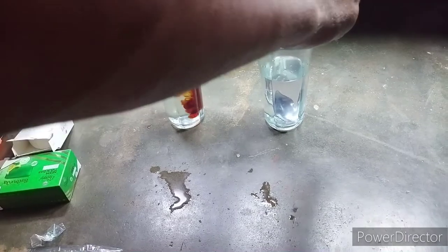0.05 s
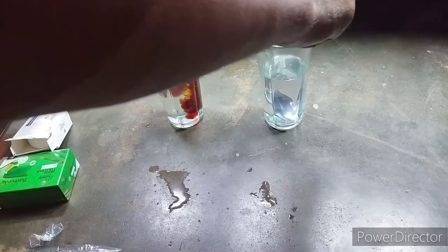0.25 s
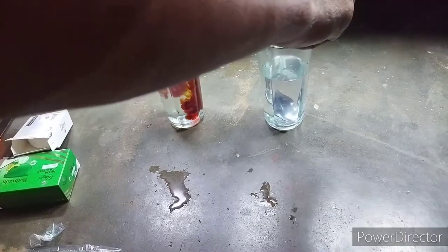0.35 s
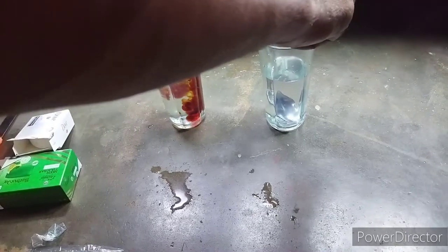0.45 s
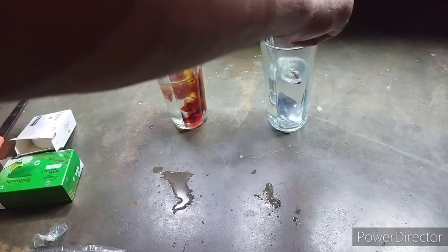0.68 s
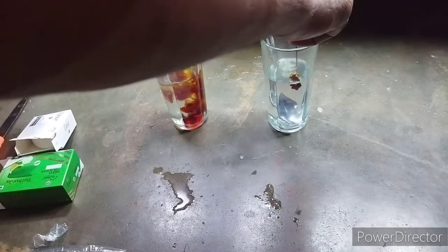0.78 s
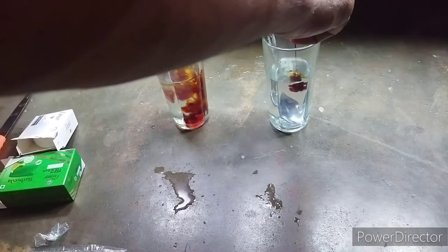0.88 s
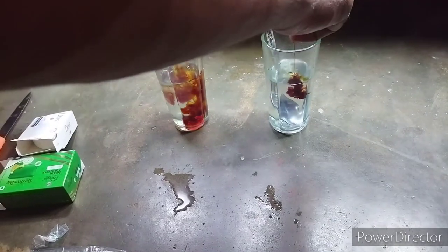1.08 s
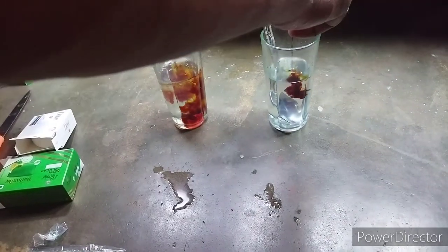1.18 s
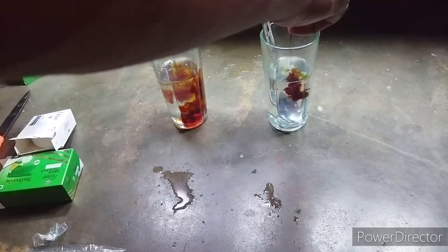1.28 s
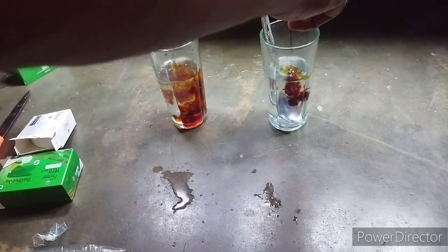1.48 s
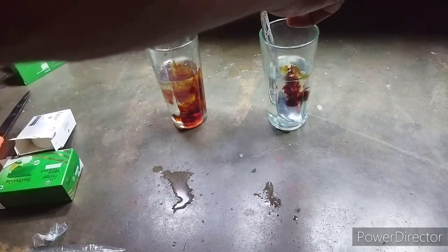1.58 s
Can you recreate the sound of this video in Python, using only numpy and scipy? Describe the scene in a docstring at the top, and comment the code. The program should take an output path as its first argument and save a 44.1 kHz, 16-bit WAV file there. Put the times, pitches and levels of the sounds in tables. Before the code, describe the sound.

Water drips softly into a glass with tiny high pings, following a low bump.

```python
"""A quiet room, one microphone close to a glass of water on a table. Drops fall in: each lands with a
faint tick, rings the glass a little and traps a tiny bubble that gives a short, high ping.
A dull handling bump booms early on, a much softer one follows, and their low ring dies away.
Room rumble, hum and hiss lie under everything."""
import sys
import numpy as np
from scipy import signal
from scipy.fft import rfft, irfft, next_fast_len
from scipy.io import wavfile
from scipy.ndimage import uniform_filter1d, map_coordinates

SR = 44100
rng = np.random.default_rng(int(sys.argv[2]) if len(sys.argv) > 2 else 0)


def master_out(mix):
    """Clip the mix to full scale and print it as 16-bit PCM to the path in sys.argv[1]."""
    frames = np.transpose(np.atleast_2d(mix))
    ceiling = np.clip(frames, -1, 1)
    pcm = np.round(ceiling * 32767).astype(np.int16)
    wavfile.write(sys.argv[1], SR, pcm)


N = 72765

# Drops landing close to the microphone: t/s, ping f/Hz, ping level/dB, ping t60/s, tick level/dB
DROPS = [(0.897, 2750, -42.5, 0.011, -52), (.9005, 13700, -40.5, 0.0073, -66.5),
         (0.9126, 5210, -43.5, 0.013, -67), (1.001, 4850, -48, 0.017, -56.5),
         (1.008, 4020, -60, 0.037, -58), (1.0213, 13000, -47, 0.0062, -65),
         (1.0387, 9800, -44.5, 0.0071, -53), (1.0534, 11650, -42.5, .009, -55),
         (1.0558, 7350, -52, .015, -68), (1.0655, 2880, -50.5, .025, -49.5),
         (1.1651, 3820, -55, 0.034, -59), (1.1872, 11740, -41, 0.009, -55), (1.1894, 3990, -57, 0.048, -73),
         (1.1911, 2477, -59.5, 0.096, -59), (1.215, 4370, -54, 0.017, -62),
         (1.2362, 7000, -50, 0.0044, -58), (1.316, 3020, -56, 0.027, -54), (1.3186, 3830, -56, 0.042, -59),
         (1.3245, 12800, -53, 0.0036, -53.5), (1.3477, 4660, -41.5, .013, -56),
         (1.4201, 2740, -54, 0.033, -53), (1.426, 8500, -44, 0.011, -59), (1.4289, 7130, -42.5, 0.013, -68),
         (1.5132, 2870, -43, 0.02, -51.5), (1.605, 7100, -56.5, .006, -70),
         (1.6298, 3860, -45.5, 0.037, -53), (1.6304, 6930, -39.5, 0.0084, -59.5)]
# Colour of the tick on the water: f/Hz, relative level/dB
TICK_SPECTRUM = [(500, -14), (1800, 14), (2800, 16.5), (5000, 20), (9000, 17.5), (14000, 16), (16000, -11)]
# Modes of the glass: f/Hz, level/dB re the tick, t60/s
GLASS_MODES = [(2437, -18, 0.24), (2716, -17.5, 0.18), (3990, -20, 0.07), (5150, -16, 0.09),
               (8360, -23.5, 0.2)]
def drips(attack_s=0.00047, tick_t60_s=0.014, echoes_db=-8, room_db=-7.5):
    """Each drop ticks on the water, rings the glass and traps a bubble; table and room answer."""
    out = np.zeros(N)
    splash, white = noise(TICK_SPECTRUM), rng.standard_normal(N)
    for start, hz, ping_db, t60, tick_db in DROPS:
        t = since(start)
        ping = amp(ping_db) * bubble(t, hz, t60, white)
        ring = sum(amp(db + rng.normal(0, 0.8)) * np.sin(2 * np.pi * f * t) * fade(t, life)
                   for f, db, life in GLASS_MODES)
        tick = amp(tick_db) * (splash * fade(t, tick_t60_s) + ring)
        drop = (ping + tick) * (1 - np.exp(-t / attack_s))
        out += drop + amp(echoes_db) * near_echoes(drop) + amp(room_db) * room_tail(drop)
    return out


def bubble(t, hz, t60, white, rise_per_s=1.24, waver_rad=0.54, spatter_db=-11, spatter_octaves=0.17):
    """A trapped bubble pings, climbing slightly, in a wet spatter of noise around its pitch."""
    waver = waver_rad * wobble(400)
    phase = 2 * np.pi * hz * t * (1 + rise_per_s * np.minimum(t, t60) / 2) + waver
    spatter = unit(filtered(white, lambda f: 1 / (1 + (np.log2((f + 1) / hz) / spatter_octaves) ** 2)))
    return np.sin(phase) * fade(t, t60) + amp(spatter_db) * spatter * fade(t, 1.62 * t60)


def near_echoes(x, first_s=0.003, span_s=0.012):
    """Eight early echoes reach the microphone off nearby surfaces such as the table."""
    delays_s = first_s + span_s * rng.random(8)
    gains = rng.standard_normal(8)
    gains /= np.linalg.norm(gains)
    return sum(gain * np.pad(x, (int(SR * s), 0))[:N] for s, gain in zip(delays_s, gains))


# Decay of the room around the glass: f/Hz, t60/s
ROOM_DECAY = [(500, .3), (3000, 0.68), (8000, 0.38), (15000, 0.34)]
def room_tail(x):
    """The room's faint reverberation, lingering longest around 3 kHz."""
    hz, t, spectra = signal.stft(rng.standard_normal(SR // 2), SR, nperseg=256)
    tail = signal.istft(spectra * fade(t, along(ROOM_DECAY, hz)[:, None]), SR, nperseg=256)[1]
    tail = np.pad(tail, (SR // 400, 0)) / np.linalg.norm(tail)  # arrives 2.5 ms late
    return signal.fftconvolve(x, tail)[:N]


# Handling bumps: t/s, level/dB
HANDLING_BUMPS = [(0.211, -26), (0.789, -46)]
# Low ring of a bump: f/Hz, level/dB re the bump, t60/s, attack/s
BOOM_MODES = [(54.85, 4.5, 0.8, 0.028), (91, -5, 1, 0.062), (110.5, -13, 0.86, 0.025),
              (142.4, -13, .36, 0.016), (175.5, -23.5, 0.44, 0.011)]
# Colour of its dull puff: f/Hz, relative level/dB
THUD_SPECTRUM = [(30, -13), (60, -5.5), (140, -5.5), (250, -13.5), (500, -27), (1200, -55), (4000, -90)]
def bumps(twin_offset_hz=9, twin_db=-6.5, thud_db=-18, thud_t60_s=0.58, thud_attack_s=0.0042):
    """A soft knock swells into low modes, each beating with a weaker twin, and a puff of dull noise."""
    out = np.zeros(N)
    for start, db in HANDLING_BUMPS:
        t = since(start)
        for hz, mode_db, t60, attack_s in BOOM_MODES:
            twin = amp(twin_db) * np.sin(2 * np.pi * (hz + twin_offset_hz) * t)
            pair = np.sin(2 * np.pi * hz * t) - twin
            out += amp(db + mode_db) * pair * fade(t, t60) * (1 - np.exp(-t / attack_s))
        thud = noise(THUD_SPECTRUM) * fade(t, thud_t60_s) * (1 - np.exp(-t / thud_attack_s))
        out += amp(db + thud_db) * thud
    return out


# Colour of the room's rumble: f/Hz, relative level/dB
RUMBLE_SPECTRUM = [(20, -14.5), (36, -24.5), (48, -2), (60, -6.5), (77, -16), (100, -4), (130, -8),
                   (170, -18.5), (215, -16), (260, -25), (320, -23.5), (520, -28.5), (750, -34),
                   (1100, -40), (1800, -44.5), (4000, -89)]
# Its slow rise and fall: t/s, level/dB
RUMBLE_SWELL = [(0, -54), (0.149, -56.5), (.4, -52), (.85, -51.5), (1.25, -53), (1.65, -52)]
# Hum in the room, at the swell's last point: f/Hz, rms level/dB
HUM_LINES = [(64.6, -49.5), (97, -57.5), (306, -71), (402, -83), (603, -79.5), (705, -84), (783, -82.5)]
# Colour of the hiss floor: f/Hz, relative level/dB
HISS_SPECTRUM = [(100, -22.5), (300, 19), (600, 11.5), (1000, 3.5), (1800, 2), (3500, 0.5), (5500, -1.5),
                 (6900, 2), (8500, -2.5), (12000, -3), (15500, -3)]
def room_tone(waver_db=2.5, waver_rad=0.51, hiss_db=-66):
    """Behind the glass, low rumble and a wavering hum swell together over a steady hiss."""
    times, levels = np.transpose(RUMBLE_SWELL)
    swell_db = np.interp(since(0), times, levels)
    hum = np.zeros(N)
    for hz, db in HUM_LINES:
        peak = np.sqrt(2) * amp(db + waver_db * wobble(7.74))
        hum += peak * np.sin(2 * np.pi * hz * since(0) + waver_rad * wobble(8.15))
    rumble = amp(swell_db) * patchy(noise(RUMBLE_SPECTRUM), depth_db=3)
    return rumble + amp(swell_db - levels[-1]) * hum + amp(hiss_db) * noise(HISS_SPECTRUM)


def patchy(x, depth_db):
    """Narrow bands of a noise swell and sink on their own, less so below 400 Hz."""
    spectra = signal.stft(x, nperseg=2048)[2]
    drift = uniform_filter1d(rng.standard_normal(spectra.shape), size=3, axis=0)
    drift = unit(uniform_filter1d(drift, size=5, axis=1))
    above_bass = np.clip(np.fft.rfftfreq(2048, 1 / SR) / 400, 0, 1)[:, None]
    return unit(signal.istft(spectra * amp(depth_db * above_bass * drift), nperseg=2048)[1][:N])


def amp(db):
    """Decibels to gain."""
    return 10 ** (np.asarray(db) / 20)


def unit(x):
    """Scale to rms 1."""
    return x / np.sqrt(np.mean(x ** 2) + 1e-20)


def along(points, hz):
    """Read (f/Hz, value) points on a log axis."""
    f, values = np.transpose(points)
    return np.interp(np.log(hz + 1), np.log(f + 1), values)


def fade(t, t60):
    """Exponential decay, 60 dB down at t60."""
    return amp(-60 * t / t60)


def since(start):
    """Seconds since a moment, zero before it."""
    return np.maximum(np.arange(N) / SR - start, 0)


def wobble(rate):
    """A smooth random curve, rate knots a second."""
    return map_coordinates(rng.standard_normal(int(N * rate / SR) + 4), [np.arange(N) * rate / SR])


def filtered(x, response):
    """Shape x by a gain that depends on frequency."""
    size = next_fast_len(N + SR // 2)
    return irfft(rfft(x, size) * response(np.fft.rfftfreq(size, 1 / SR)), size)[:N]


def noise(spectrum):
    """Coloured noise of rms 1."""
    return unit(filtered(rng.standard_normal(N), lambda hz: amp(along(spectrum, hz))))


def scene():
    """Room, bumps and drops at one microphone."""
    return (room_tone() + bumps() + drips())[None]


# Narrow dip in the microphone's bass: f/Hz, gain/dB
MIC_BASS_DIP = [(20, -1), (36, -14), (44, -4), (52, 0.5), (70, 0)]
def record(dry, top_hz=15750):
    """The microphone dips around 36 Hz but passes the deepest rumble; the recorder cuts at top_hz."""
    return filtered(dry[0], lambda hz: amp(along(MIC_BASS_DIP, hz)) * (hz < top_hz))[None]


dry = scene()
out = record(dry)
master_out(out)
```